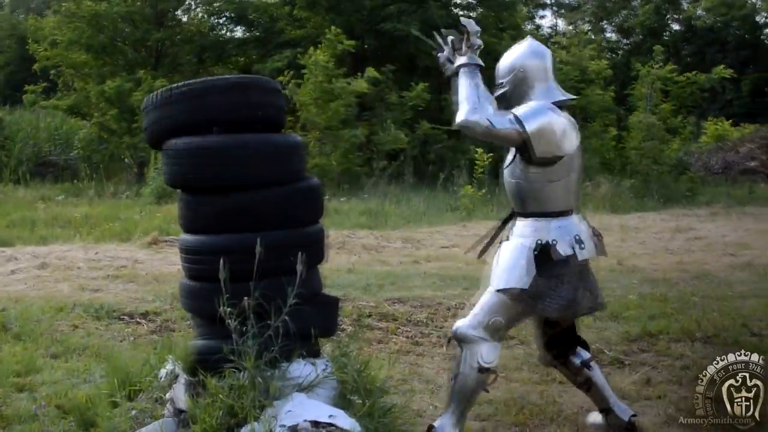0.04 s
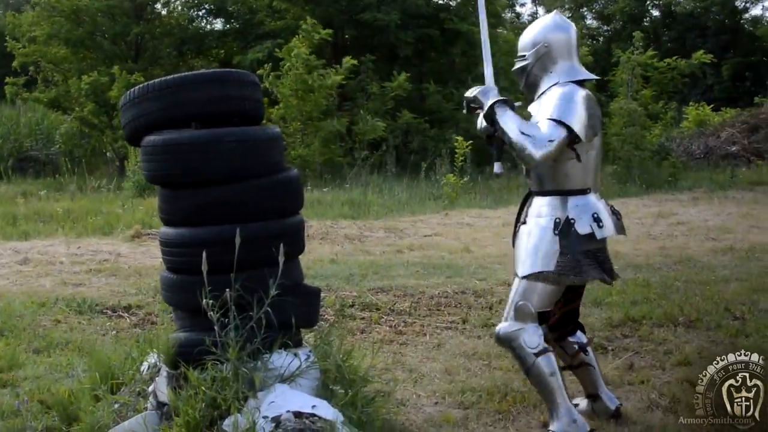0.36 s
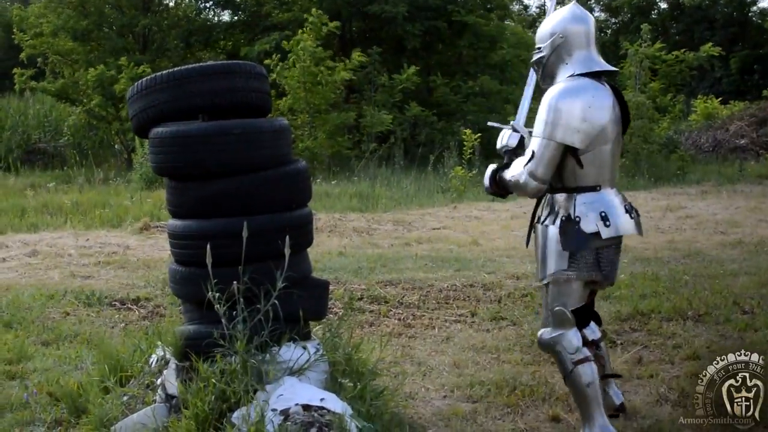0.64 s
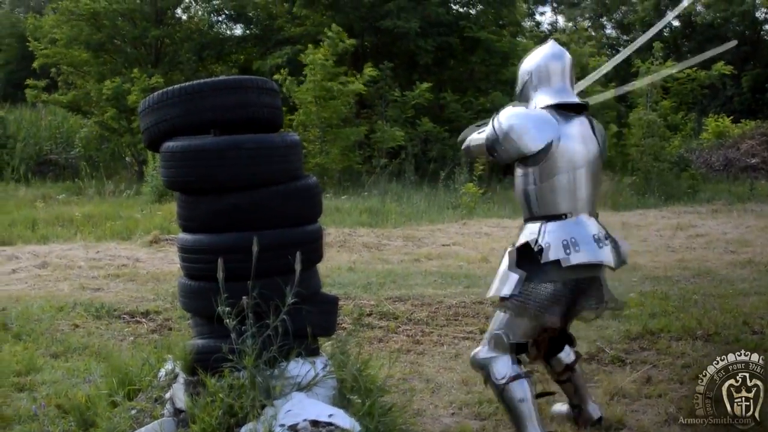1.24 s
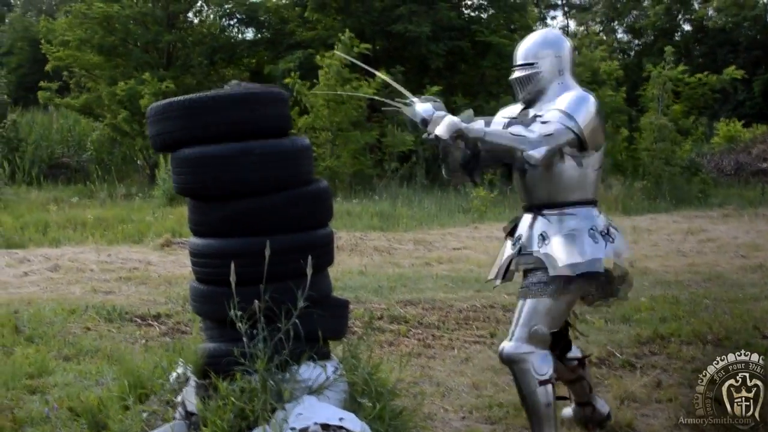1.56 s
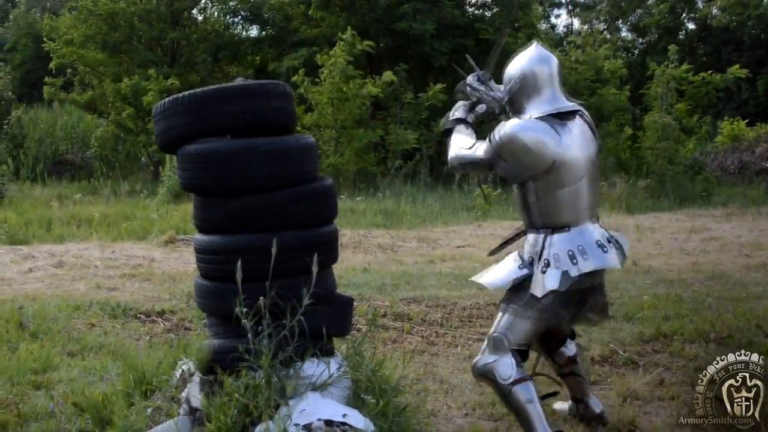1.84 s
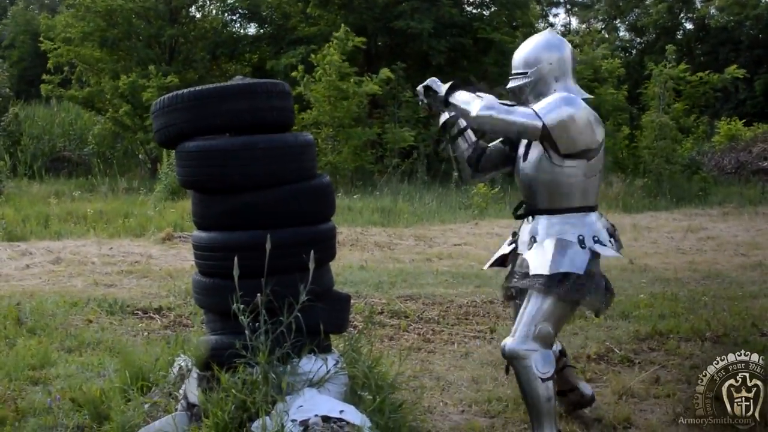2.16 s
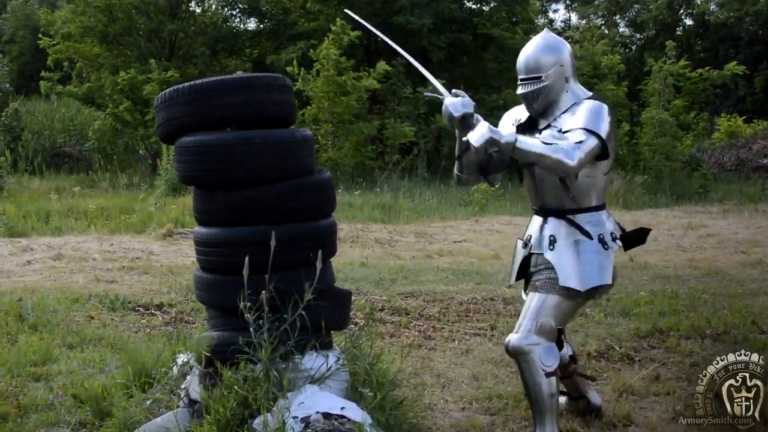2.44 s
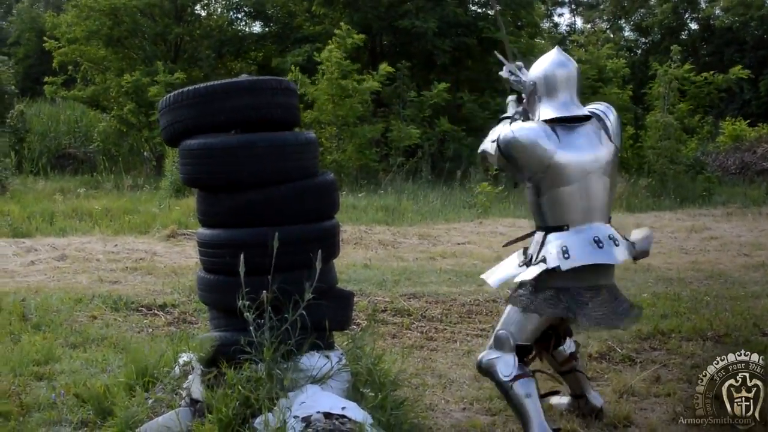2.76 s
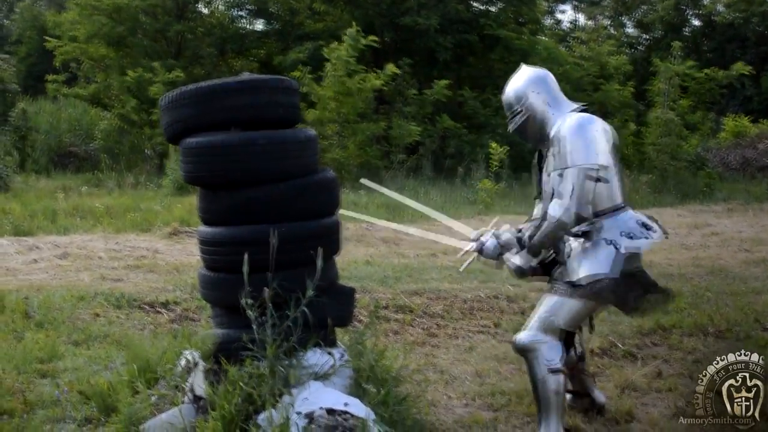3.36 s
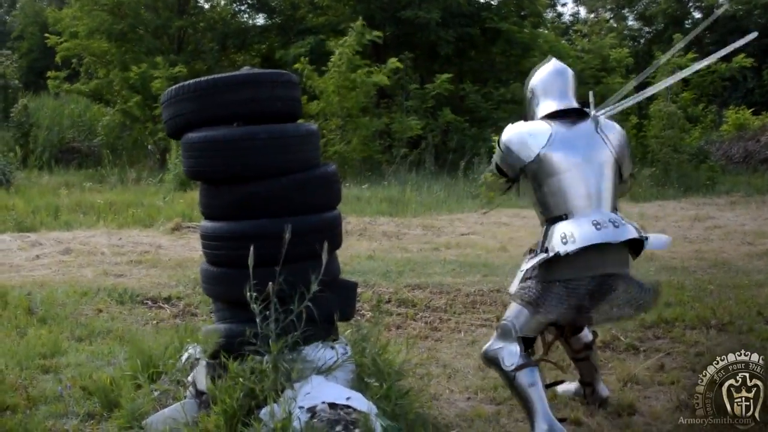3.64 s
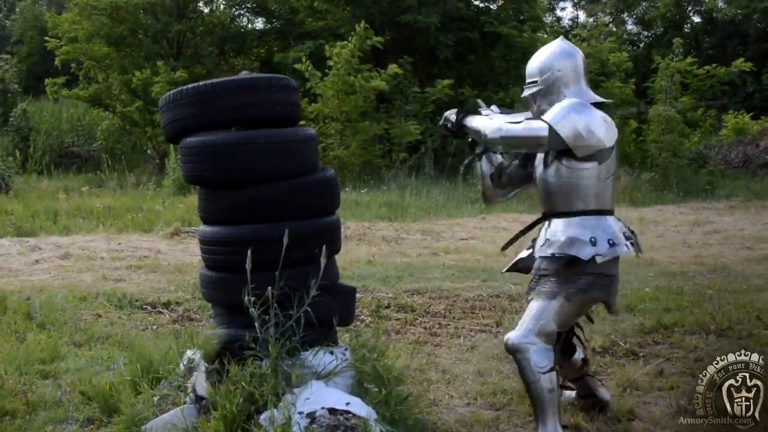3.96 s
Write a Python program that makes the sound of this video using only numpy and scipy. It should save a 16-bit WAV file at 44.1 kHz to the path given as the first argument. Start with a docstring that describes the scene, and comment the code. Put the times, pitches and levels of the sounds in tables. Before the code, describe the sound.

Plate armor and chain mail clink and clash, with three dull sword hits on rubber tires.

```python
"""A fighter in plate armor swings a sword at a stack of tires in an open field. From the start mail rustles and
plates scuff and clash over footfalls and quiet air. A steady steel ping, like distant hammering, comes three
times a second, each followed a moment later by a faint repeat of its lowest tone. A plate clangs at 1.1 s.
Three cuts slap the rubber at 1.5, 2.3 and 3.2 s, each with more boom, while low bumps crowd in and the rumble
swells. A second plate clangs at 3.4 s, and a short hollow note sounds at the end."""
import sys
import numpy as np
from scipy import signal
from scipy.fft import rfft, irfft, next_fast_len
from scipy.io import wavfile

SR = 44100
rng = np.random.default_rng(int(sys.argv[2]) if len(sys.argv) > 2 else 0)


def output_pcm(signal):
    """Save a mono or channel-first signal as 16-bit PCM at the path in sys.argv[1].

    Samples are clipped to [-1, 1] before scaling.
    """
    pcm = np.clip(np.atleast_2d(signal).T, -1, 1) * 32767
    wavfile.write(sys.argv[1], SR, np.round(pcm).astype(np.int16))


N = 176400

# level ride of the rustling mail (t/s, level/dB)
MAIL_RIDE = [(0,-22),(.15,-19),(.3,-30),(.46,-28.5),(.62,-23.5),(.785,-33.5),(.875,-26.5),(.93,-32.5),(1.06,-29),(1.1,-22),(1.31,-24.5),(1.38,-18.5),(1.47,-22),(1.54,-22.5),(1.67,-27.5),(1.76,-19.5),(1.89,-27),(1.99,-15),(2.03,-22.5),(2.24,-23),(2.38,-19),(2.43,-27),(2.51,-17.5),(2.6,-27.5),(2.72,-26),(2.86,-23),(2.96,-15),(3.01,-25),(3.13,-23.5),(3.21,-16),(3.3,-24),(3.37,-25),(3.42,-40),(3.5,-18),(3.6,-25),(3.82,-23),(3.94,-28.5)]
# plate hitting plate (t/s, bright edge level/dB, body over edge/dB)
CLASHES = [(0.015,-12,-7),(.117,-6.5,-6),(0.372,-19.5,-15),(0.656,-14,-7.5),(0.732,-17,-8.5),(0.801,-20,-15),(0.969,-13.5,-24),(1.115,-11,-7.5),(1.337,-13,-1.5),(1.351,-11.5,-13.5),(1.519,-14.5,-4),(1.743,-15.5,2),(2.043,-4.5,-17),(2.062,-7,-7),(2.271,-19,7.5),(2.297,-9,-7),(2.363,-6,-28),(2.456,-18,1),(2.544,-12,-1),(2.882,-3,-8.5),(3.223,-7.5,-12),(3.267,-10.5,-7),(3.442,-17.5,-4),(3.65,-17,-4.5),(3.791,-11.5,-10),(3.985,-13,-7.5)]
# bright sizzle of the mail (f/Hz, level/dB)
MAIL_EQ = [(900,-20),(2500,-13),(5500,-1.5),(8000,-2),(10400,2.5),(12000,-4.5),(13500,-9),(15800,-50)]
# midrange body of the plates (f/Hz, level/dB)
PLATE_EQ = [(200,-19),(500,-8),(740,2),(1000,-4),(1500,-0.5),(3500,-1.5),(9000,-12)]
# plates struck and left to ring (t/s, level per partial/dB)
CLANGS = [(1.117,-20),(3.445,-22)]
# their partials, one row per plate (f/Hz)
CLANG_MODES = [(1410,1600,1750,2500,3930,4037,4560,6169),(2050,2210,3600,3590,4000)]
# sword on tires (t/s, slap level/dB, slap t60/s, ring level/dB, boom level/dB)
CUTS = [(1.549,-1.5,0.041,-16,-47),(2.311,-6,0.093,-9.5,-18),(3.214,-6,0.15,-17,-7.5)]
# hollow ring of the tires (f/Hz, relative level/dB, t60/s)
TIRE_MODES = [(178.5,-1.5,0.19),(326.3,-1.5,0.3),(418,-0.5,0.35),(590,-6.5,0.35),(794,3.5,0.14)]
# slap of the blade on rubber (f/Hz, level/dB)
SLAP_EQ = [(200,-9.5),(400,-13),(700,-2),(1000,-11.5),(1500,-10.5),(4000,-39)]
# footfalls and low bumps (t/s, level/dB, f/Hz)
THUMPS = [(.002,-18,87),(0.376,-24,84),(1.464,-20,352),(1.604,-38.5,99),(2.172,-20.5,86),(2.636,-20,115),(2.675,-25,108),(2.727,-17,131),(2.754,-18,173),(2.932,-15,116),(2.963,-19.5,202),(3.052,-17,244),(3.854,-14,102.6)]
# one short hollow note (t/s, level/dB, f/Hz)
HOLLOW_NOTE = (3.972, -7.5, 520)
# steady steel pings, like distant hammering (t/s, ring level/dB)
PINGS = [(0.196,-24),(0.526,-24),(.853,-25.5),(1.185,-29),(1.512,-41),(1.841,-25.5),(2.16,-25.5),(2.49,-31.5),(2.819,-30),(3.156,-26.5),(3.487,-27),(3.826,-26)]
# partials of a ping (f/Hz, relative level/dB, t60/s, delay/s)
PING_MODES = [(2625,9,0.27,.024),(5300,-9,0.45,0.018),(6076,0.5,0.67,0.018)]
# the clack that starts a ping (f/Hz, level/dB)
CLACK_EQ = [(650,-4),(2400,-3.5),(2830,8),(3300,-3),(5500,-1),(6700,0),(9500,-14.5)]
# level ride of the low rumble (t/s, level/dB)
RUMBLE_RIDE = [(0,-47.5),(1.2,-44.5),(2.8,-36)]
# dark tone of the rumble and of each thump's puff (f/Hz, level/dB)
RUMBLE_EQ = [(20,0),(70,2.5),(200,-5),(600,-22.5)]
# open-air bed (f/Hz, level/dB)
AIR_EQ = [(100, -3), (290, -10), (400, 14.5), (490, -7), (900, 5), (9000, -21)]

GRAINS_PER_S, GRAIN_SPREAD_DB, FLUTTER_DB, FLUTTER_PER_S = 9000, 2, 1.83, 85
SCUFF_DB, SCUFF_FOLLOWS = -30, 0.94  # mean level, share of the mail's swing
CLASH_RISE_S, CLASH_T60_S, CLANG_T60_S = 0.001, 0.091, 0.24
CHINK_COUNT, CHINK_HZ, CHINK_T60_S = 500, 8424, 0.032
STEEL_ROUGH, RUBBER_ROUGH = 0.39, 0.95  # depth of the beating in a partial
TIRE_RISE_S, BOOM_HZ, BOOM_T60_S = 0.0082, 102, 0.23
THUMP_RISE_S, THUMP_T60_S = 0.0016, 0.11
PING_RISE_S, CLACK_DB, CLACK_T60_S = 0.0034, -18, 0.24
REPEAT_DELAY_S, REPEAT_DB = 0.16, -11.5
AIR_DB, CEILING, TOP_HZ = -43, 0.54, 15800


def armor():
    """Mail rustles and plates scuff with the movement; both flare up at each clash."""
    edge, body = clash_envelopes()
    mail_db = curve(MAIL_RIDE)
    scuff_db = SCUFF_DB + SCUFF_FOLLOWS * (mail_db - mail_db.mean())
    rustle = amp(mail_db + FLUTTER_DB * wobble(FLUTTER_PER_S))
    mail = np.hypot(rustle, edge) * unit(grains(MAIL_EQ) + 2 * chinks())  # envelopes add in power
    scuff = amp(scuff_db + FLUTTER_DB * wobble(FLUTTER_PER_S))
    plates = np.hypot(scuff, body) * grains(PLATE_EQ)
    return mail + plates


def clash_envelopes():
    """Edge and body of the clashes share one burst: clashes heavy in body slide in with a slower attack and
    longer tail, while edge-heavy ones snap."""
    edge, body = np.zeros(N), np.zeros(N)
    mean_body_db = np.mean([body_db for _, _, body_db in CLASHES])
    for s, db, body_db in CLASHES:
        stretch = amp(0.32 * (body_db - mean_body_db))
        burst = amp(db) * fade(CLASH_T60_S * stretch, CLASH_RISE_S * stretch)
        add(edge, s, burst)
        add(body, s, amp(body_db) * burst)
    return edge, body


def chinks():
    """Single rings of the mail chink at random times, each at its own pitch."""
    out, t = np.zeros(N), np.arange(SR // 20) / SR
    decay = np.exp(-np.log(1000) * t / CHINK_T60_S)
    times = rng.random(CHINK_COUNT) * N / SR
    for s, (pitch, size) in zip(times, rng.standard_normal((CHINK_COUNT, 2))):
        hz = CHINK_HZ * np.exp(0.3 * min(pitch, 1))
        add(out, s, amp(GRAIN_SPREAD_DB * size) * decay * np.sin(2 * np.pi * hz * t))
    return out


def plate_clangs():
    """Struck plates ring briefly on inharmonic partials, duller than the pings."""
    out = np.zeros(N)
    for (s, db), partials in zip(CLANGS, CLANG_MODES):
        for hz in partials:
            add(out, s, amp(db) * mode(hz, CLANG_T60_S, CLASH_RISE_S, STEEL_ROUGH))
    return out


def sword_cuts():
    """The blade slaps the rubber, the stack booms and a short hollow ring follows."""
    slap, ring = np.zeros(N), np.zeros(N)
    for s, slap_db, slap_t60, ring_db, boom_db in CUTS:
        add(slap, s, amp(slap_db) * fade(slap_t60, rise=0.0005))
        add(ring, s, amp(boom_db) * mode(BOOM_HZ, BOOM_T60_S, THUMP_RISE_S, RUBBER_ROUGH))
        for hz, level, t60 in TIRE_MODES:
            add(ring, s, amp(ring_db + level) * mode(hz, t60, TIRE_RISE_S, RUBBER_ROUGH))
    return ring + slap * noise(SLAP_EQ)


def thumps():
    """Footfalls and bumps land as soft low knocks with a dull puff; one hollow note comes last."""
    knocks, puff = np.zeros(N), np.zeros(N)
    for s, db, hz in THUMPS:
        add(knocks, s, amp(db) * mode(hz, THUMP_T60_S, THUMP_RISE_S, rough=0.19))
        add(puff, s, amp(db - 3) * fade(THUMP_T60_S, THUMP_RISE_S))
    s, db, hz = HOLLOW_NOTE
    add(knocks, s, amp(db) * mode(hz, BOOM_T60_S, TIRE_RISE_S, RUBBER_ROUGH))
    return knocks + puff * noise(RUMBLE_EQ)


def steel_pings():
    """Like distant hammering: a clack, a clear ring, then a moment later a faint repeat of the lowest partial."""
    clack, ring = np.zeros(N), np.zeros(N)
    grit = grains(CLACK_EQ)
    for s, db in PINGS:
        add(clack, s, amp(CLACK_DB) * fade(CLACK_T60_S, PING_RISE_S))
        for hz, level, t60, delay in PING_MODES:
            add(ring, s + delay, amp(db + level) * mode(hz, t60, PING_RISE_S, STEEL_ROUGH))
        hz, level, t60, _ = PING_MODES[0]
        repeat = amp(db + level + REPEAT_DB) * mode(hz, t60, PING_RISE_S, STEEL_ROUGH)
        add(ring, s + REPEAT_DELAY_S, repeat)
    return clack * grit + ring


def field():
    """The bed: a wavering low rumble swells under steady, quiet open air."""
    rumble_db = curve(RUMBLE_RIDE) + 0.83 * wobble(rate=8.5)
    return amp(rumble_db) * noise(RUMBLE_EQ) + amp(AIR_DB) * noise(AIR_EQ)


def grains(eq):
    """A dense spray of tiny steel contacts of uneven size."""
    hits = rng.random(N) < GRAINS_PER_S / SR
    polarity = np.sign(rng.standard_normal(N))
    size = amp(GRAIN_SPREAD_DB * np.clip(rng.standard_normal(N), -3, 3))
    return equalized(hits * polarity * size, eq)


def mode(hz, t60, rise, rough):
    """One ringing partial that beats unevenly by the amount rough."""
    t = np.arange(SR // 2) / SR
    beats = 1 + rough * (wobble(80) + 1j * wobble(80))[:len(t)]
    tone = np.exp(2j * np.pi * (hz * t + rng.random()))
    return fade(t60, rise) * np.real(beats * tone) / np.sqrt(1 + 2 * rough ** 2)


def fade(t60, rise):
    """Half-second envelope: quick attack, exponential tail."""
    t = np.arange(SR // 2) / SR
    return np.exp(-np.log(1000) * t / t60) * (1 - np.exp(-t / rise))


def noise(eq):
    """Shaped noise at rms 1."""
    return equalized(rng.standard_normal(N), eq)


def equalized(x, eq):
    """x through an EQ curve (f/Hz, level/dB), rolled off past both ends, at rms 1."""
    f, db = np.transpose(eq)

    def response(hz):
        gain = amp(np.interp(np.log(hz + 1), np.log(f), db))
        low_cut = np.sqrt(1 + (f[0] / (2 * hz + 1)) ** 4)
        high_cut = np.sqrt(1 + (hz / (2 * f[-1])) ** 4)
        return gain / low_cut / high_cut
    return unit(filtered(x, response))


def filtered(x, response):
    """Apply a frequency response to x."""
    size = next_fast_len(N + 8192)
    return irfft(rfft(x, size) * response(np.fft.rfftfreq(size, 1 / SR)), size)[:N]


def wobble(rate):
    """Smooth random modulation, rate knots a second."""
    smooth = signal.resample_poly(rng.standard_normal(1024), 8, 1)
    return np.interp(np.arange(N) * rate / SR, np.arange(len(smooth)) / 8, smooth)


def curve(ride):
    """One level per sample from (t/s, level/dB) points."""
    return np.interp(np.arange(N) / SR, *np.transpose(ride))


def amp(db):
    """Decibels to gain."""
    return 10 ** (np.asarray(db) / 20)


def unit(x):
    """Scale to rms 1."""
    return x / np.sqrt(np.mean(x ** 2) + 1e-20)


def add(track, s, sound):
    """Mix a sound into the track at s seconds."""
    start = max(0, round(s * SR))
    track[start:start + len(sound)] += sound[:max(0, N - start)]


def scene():
    """Mono mix of steel, rubber, footfalls and field."""
    return (armor() + steel_pings() + plate_clangs() + sword_cuts() + thumps() + field())[None]


def record(dry):
    """Soft-clip the highest peaks and cut everything above TOP_HZ."""
    rounded = dry[0] / (1 + (dry[0] / CEILING) ** 6) ** (1 / 6)
    return filtered(rounded, lambda hz: hz < TOP_HZ)[None]


dry = scene()
out = record(dry)
output_pcm(out)
```